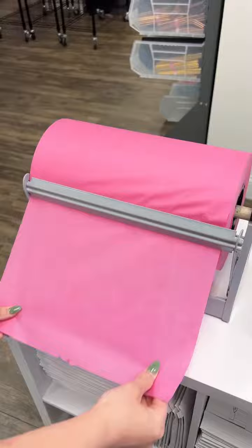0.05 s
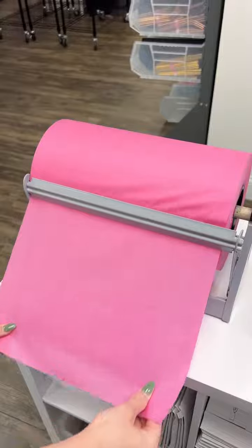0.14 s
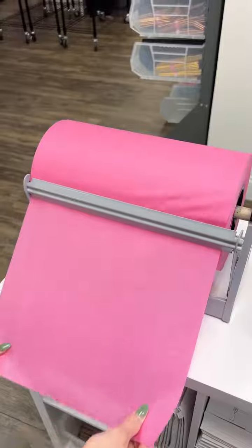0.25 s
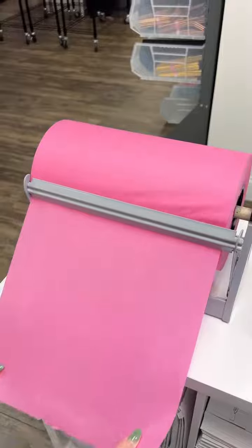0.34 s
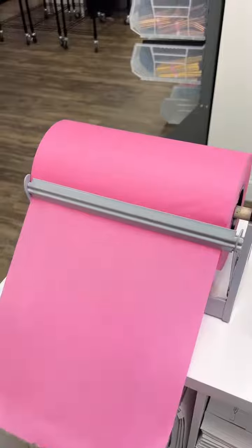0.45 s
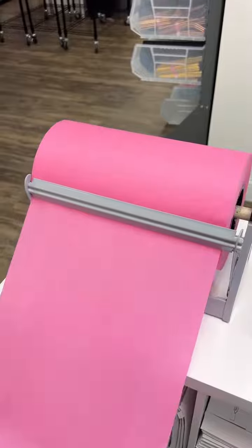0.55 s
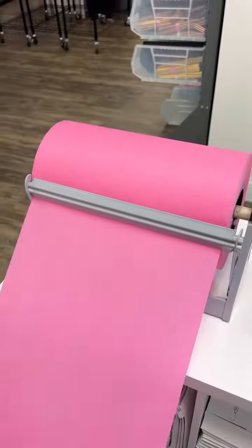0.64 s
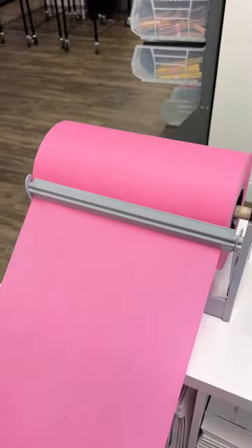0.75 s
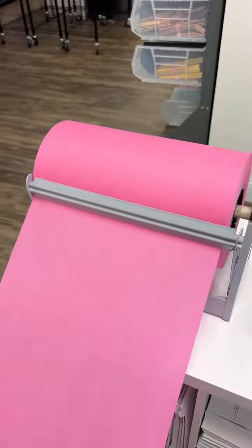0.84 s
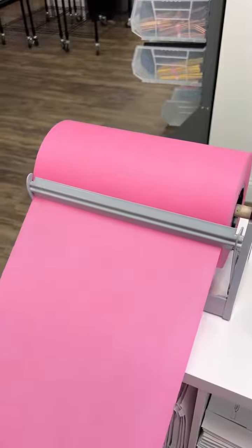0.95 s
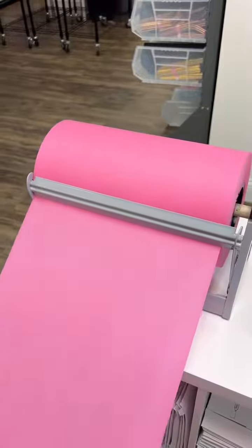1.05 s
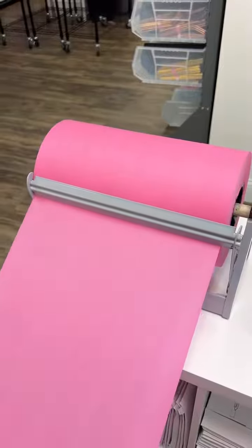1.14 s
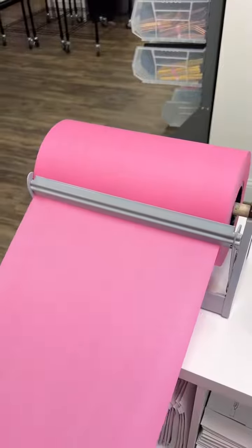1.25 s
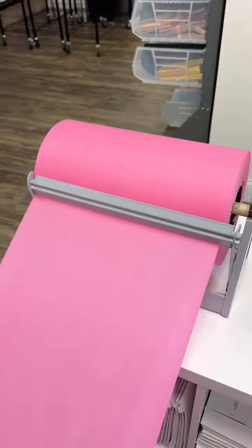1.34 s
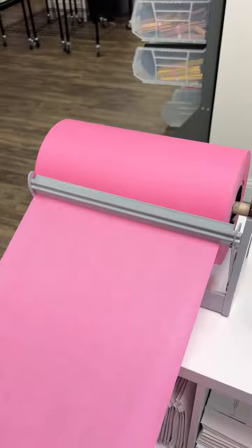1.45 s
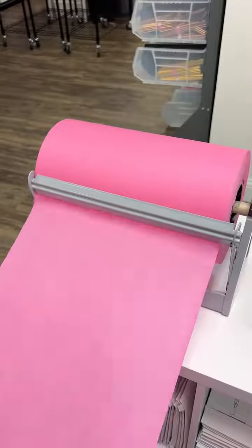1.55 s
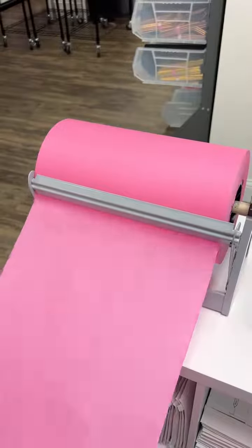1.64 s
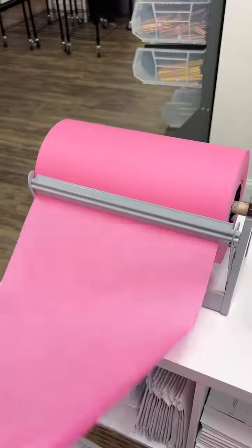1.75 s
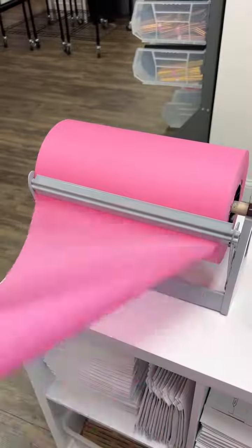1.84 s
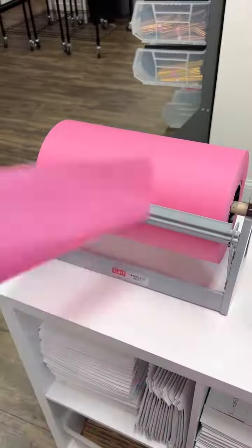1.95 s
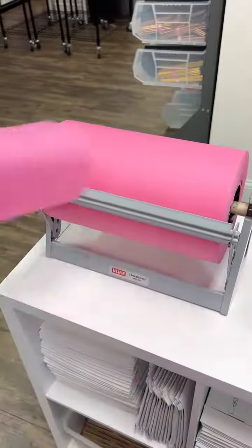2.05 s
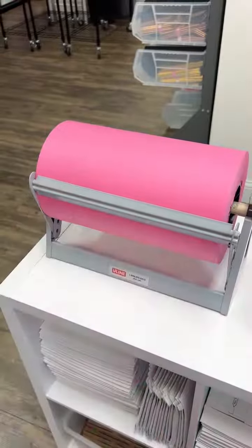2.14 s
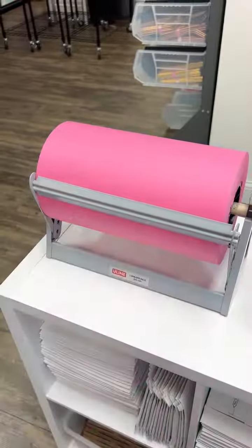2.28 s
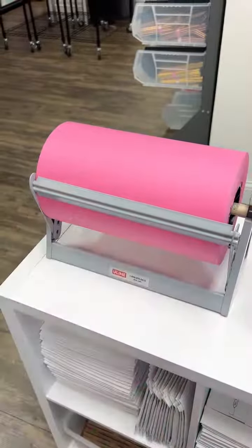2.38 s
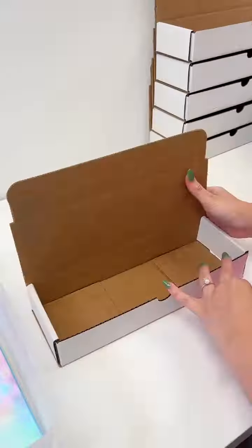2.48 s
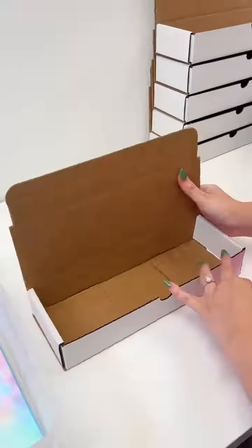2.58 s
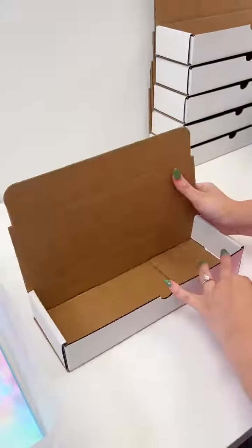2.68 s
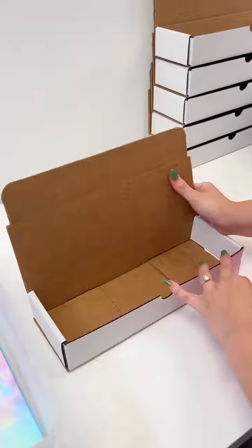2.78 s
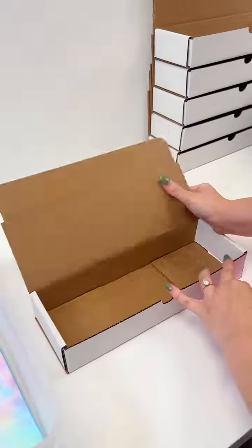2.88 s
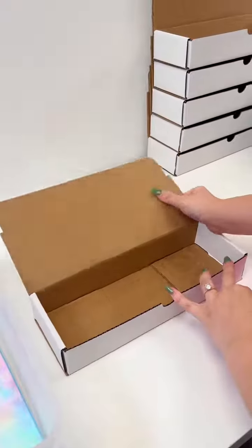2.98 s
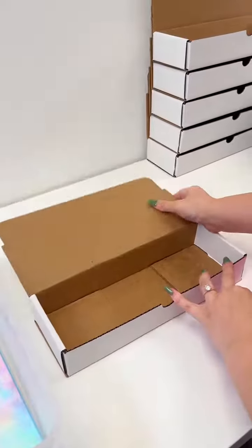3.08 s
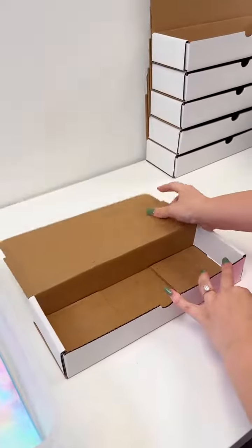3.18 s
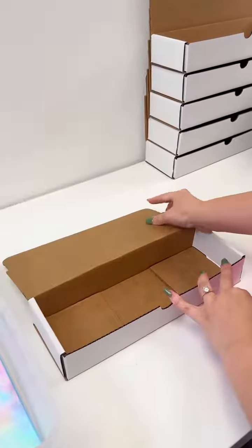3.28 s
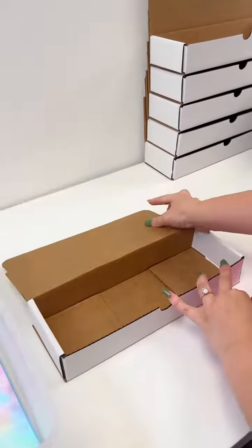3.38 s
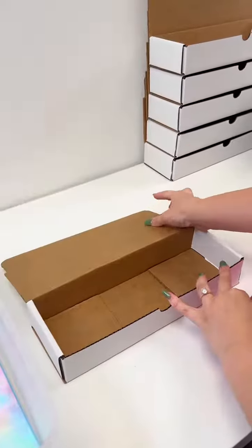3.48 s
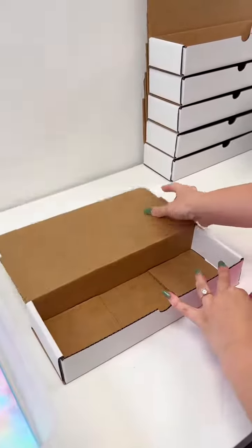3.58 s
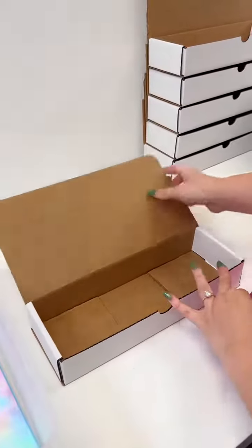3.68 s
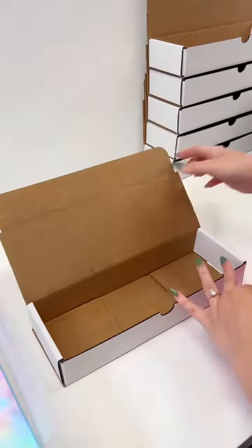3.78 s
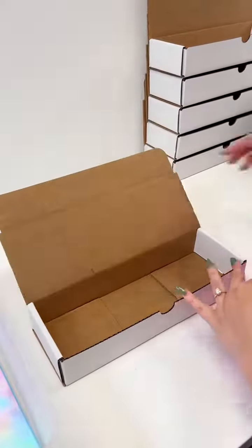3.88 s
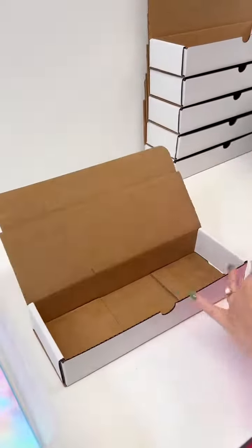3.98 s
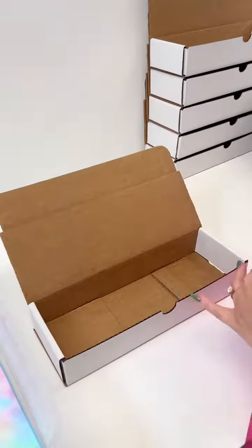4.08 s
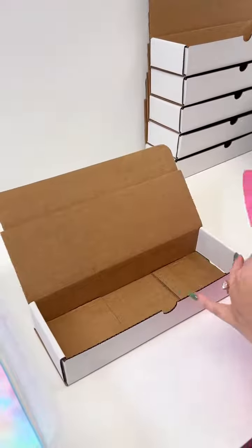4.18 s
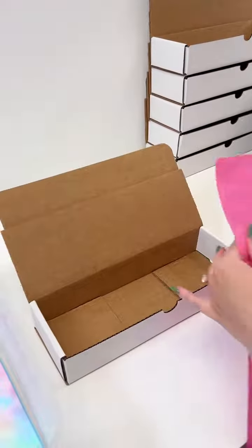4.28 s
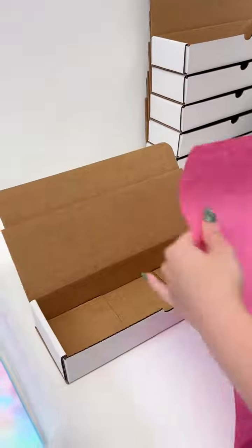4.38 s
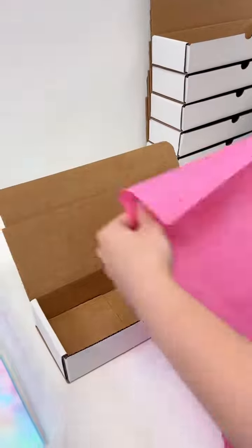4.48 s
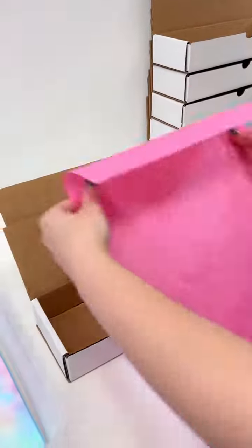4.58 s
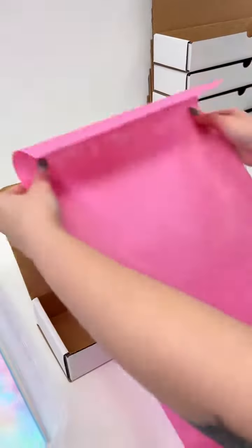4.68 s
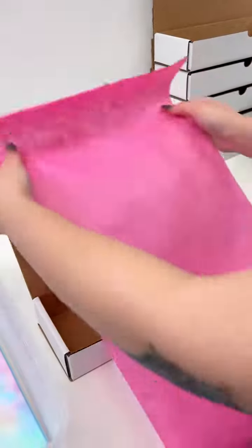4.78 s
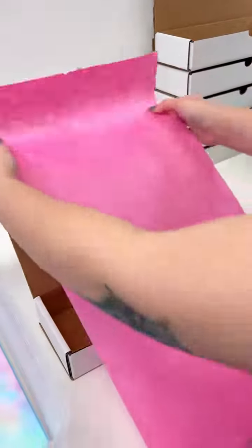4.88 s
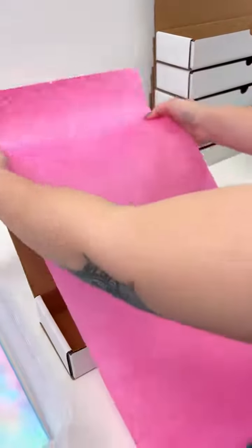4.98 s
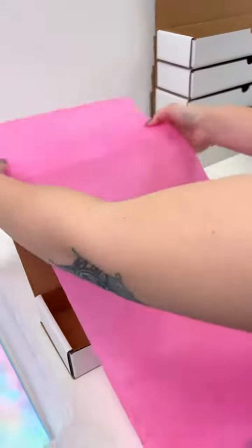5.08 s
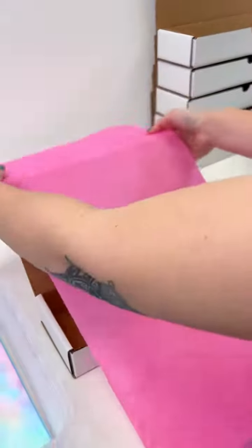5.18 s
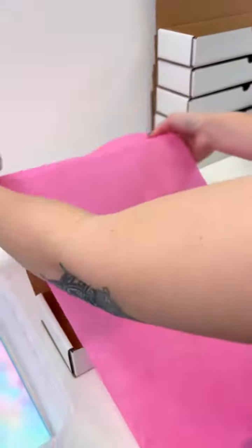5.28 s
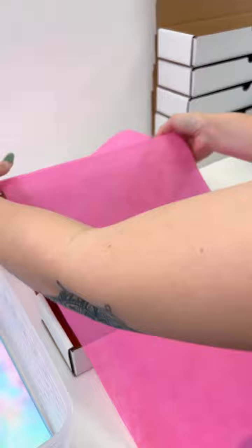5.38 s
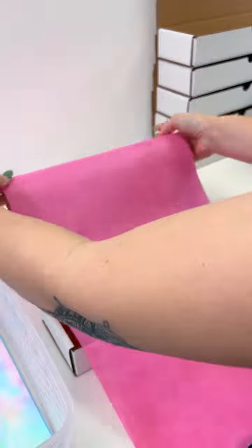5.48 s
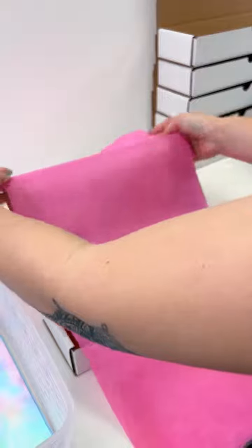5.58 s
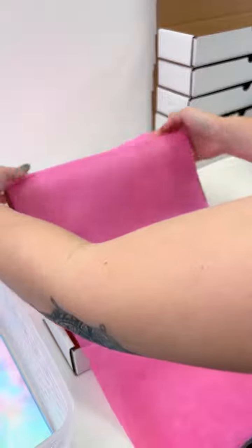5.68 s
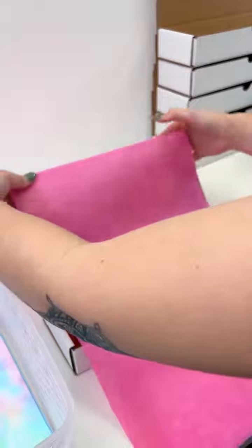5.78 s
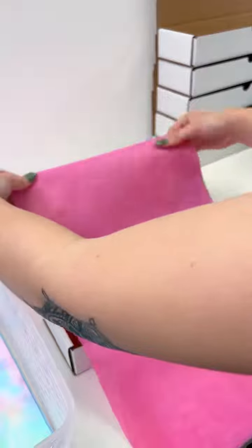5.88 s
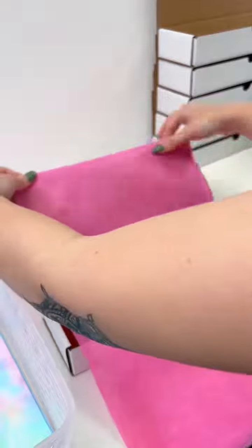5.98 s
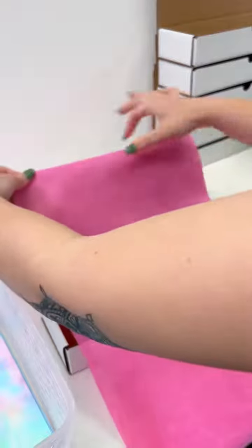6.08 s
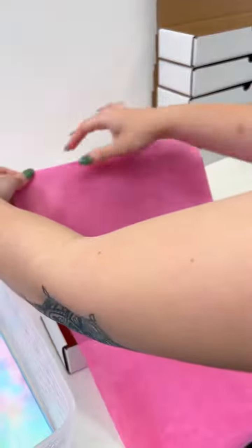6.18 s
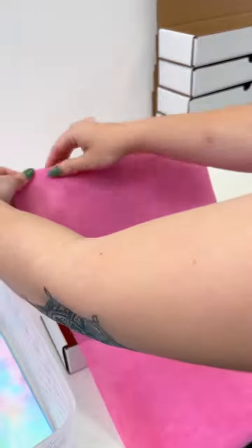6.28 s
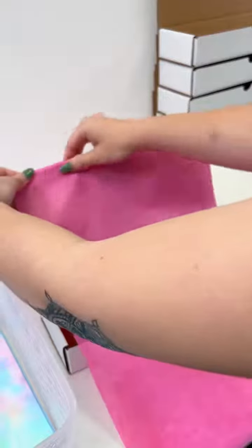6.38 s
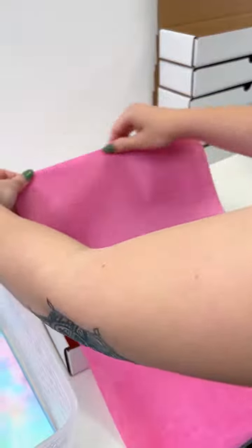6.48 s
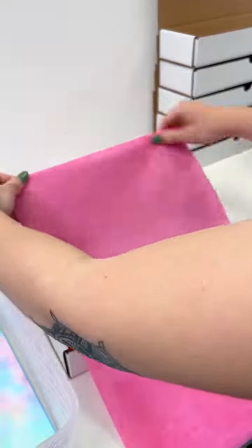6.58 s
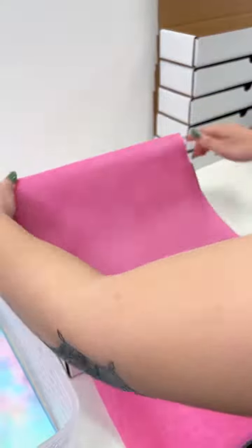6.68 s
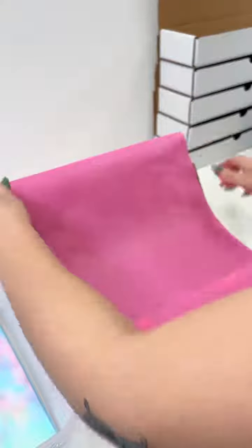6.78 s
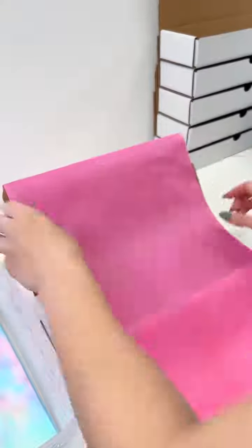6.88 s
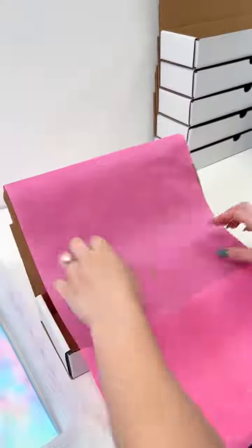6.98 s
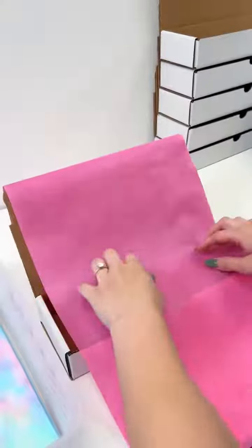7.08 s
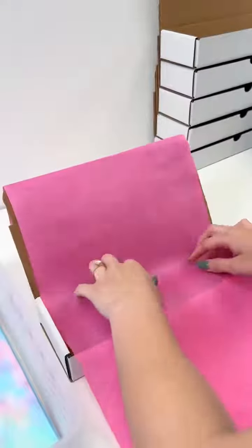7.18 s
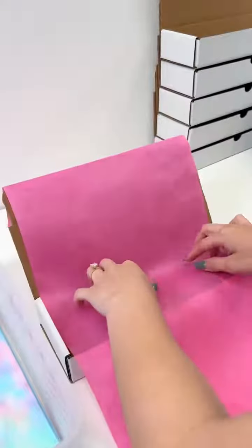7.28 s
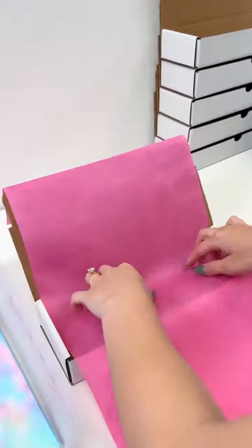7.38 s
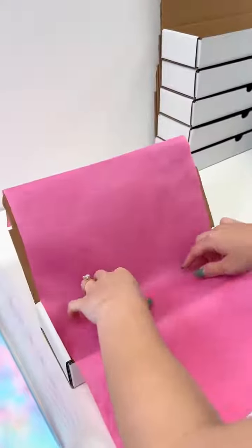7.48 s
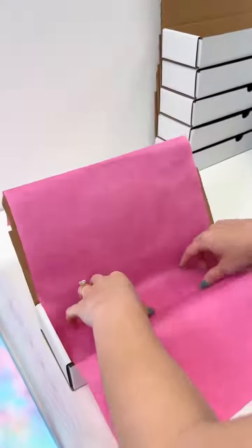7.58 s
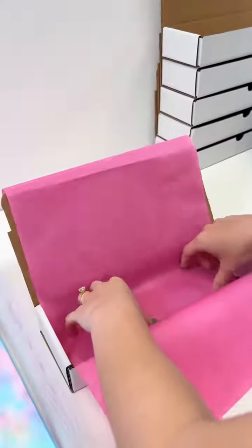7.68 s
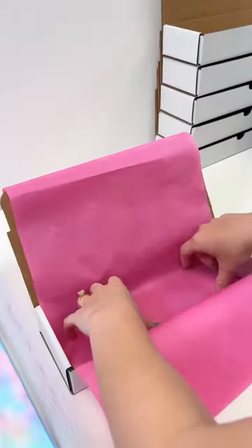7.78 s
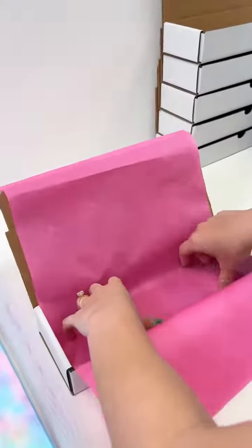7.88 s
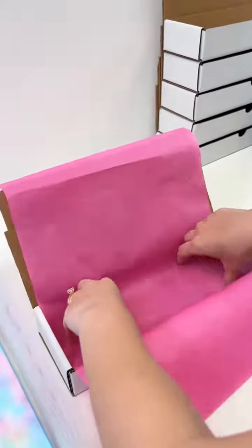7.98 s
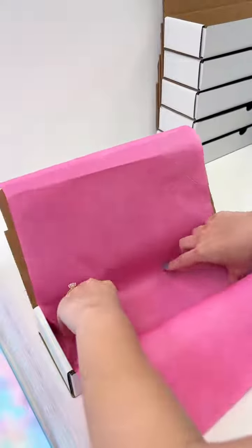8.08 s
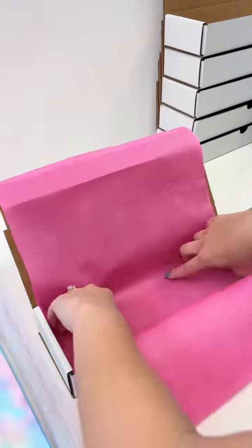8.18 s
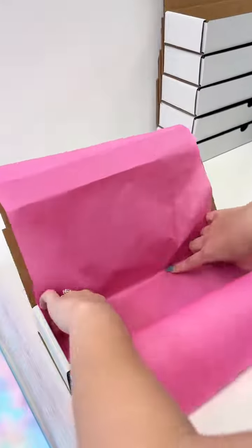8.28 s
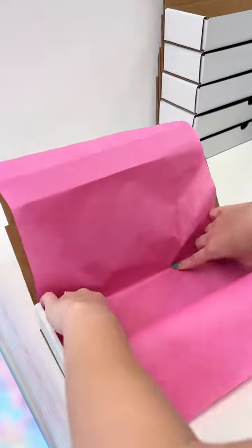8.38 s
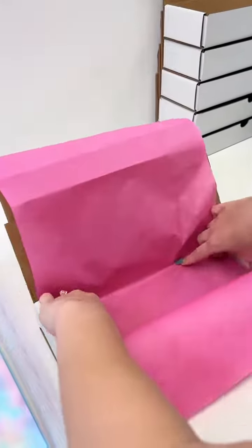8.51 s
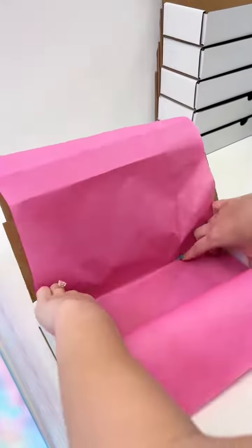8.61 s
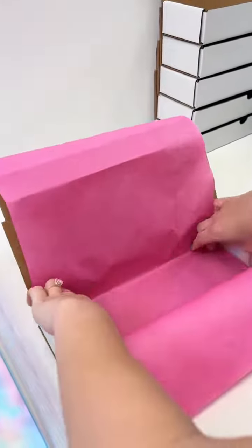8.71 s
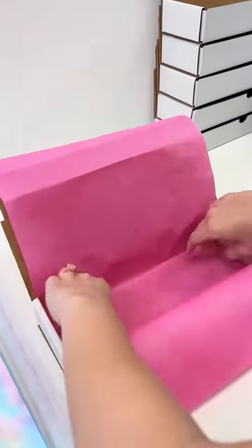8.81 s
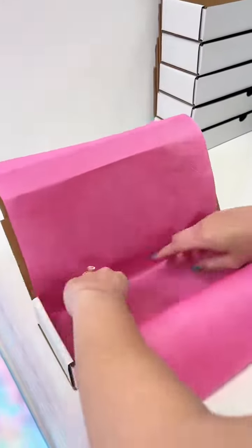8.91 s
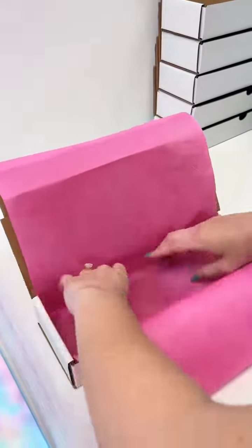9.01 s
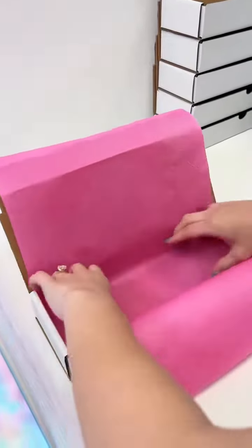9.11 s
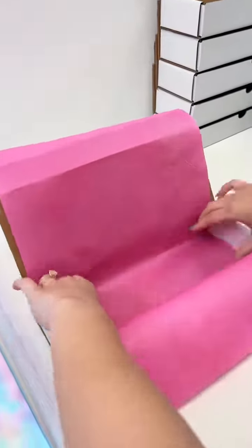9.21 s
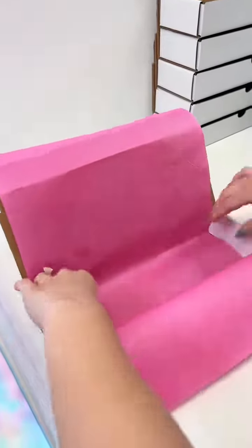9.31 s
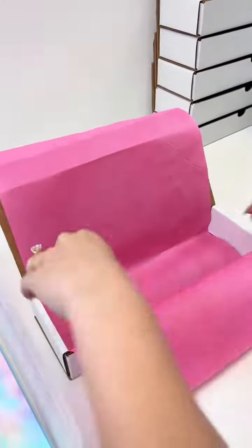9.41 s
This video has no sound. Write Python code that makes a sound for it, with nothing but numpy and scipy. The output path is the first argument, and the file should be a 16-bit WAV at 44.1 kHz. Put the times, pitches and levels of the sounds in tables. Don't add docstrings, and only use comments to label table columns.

```python
import sys
import numpy as np
from scipy import signal
from scipy.fft import rfft, irfft, next_fast_len
from scipy.io import wavfile
from scipy.ndimage import uniform_filter1d

SR = 44100
rng = np.random.default_rng(int(sys.argv[2]) if len(sys.argv) > 2 else 0)


def to_linear_factor(level_db):
    exponent = np.asarray(level_db, float) / 20
    return 10 ** exponent


def wav_record(signal):
    frames = np.transpose(np.atleast_2d(signal))
    bounded = np.clip(frames, -1, 1)
    quanta = np.round(bounded * 32767).astype(np.int16)
    wavfile.write(sys.argv[1], SR, quanta)


N = 416744

# (frequency [Hz], density [dB per Hz])
AIR_COLOUR = [(15, -29), (28, -3), (60, 3), (88, 4), (120, 0), (160, -16.5), (235, -10.5), (330, -11),
              (400, -20), (700, -22), (1100, -32), (2000, -38), (6300, -59), (12000, -63.5)]
# (time [s], level [dB])
AIR_SWELL = [(0, -52), (2.7, -49.5), (3.3, -47.5), (6.5, -49.5), (7.96, -50), (8.18, -45.5), (9.45, -51)]
# (frequency [Hz], level [dB])
SQUEAK_LINES = [(940, -51), (2350, -54), (4100, -61), (6300, -58)]
# (time [s], level [dB], hardness [dB])
KNOCKS = [(2.812, -33, -12), (2.8265, -4, -1), (2.8395, -13, -5), (2.866, -28, -2), (2.877, -27, -6),
          (2.926, -38, -2), (2.948, -33, -5), (2.981, -34, -6), (3.243, -30, -3), (3.25, -35, -12),
          (5.429, -37, -8), (5.516, -31, -2), (4.575, -40, 2), (5.816, -28, 0), (8.8758, -31, -3),
          (9.03, -28, 2), (9.08, -33, -3), (8.345, -36, -2)]
# (frequency [Hz], level [dB], decay time t60 [s])
BOX_MODES = [(89, -13.5, 0.15), (150, -18, .07), (240, -7.5, 0.08), (362.4, 6.5, 0.046), (419, -1, 0.07),
             (520, -9, 0.06), (880, -10, 0.035), (1100, 0, .016), (1720, -3, 0.009), (2300, -13, .01),
             (2900, -17, 0.008), (3830, -20, 0.007)]
# (frequency [Hz], width [Hz], level [dB])
HOLLOW = [(247, 139, 2), (359.5, 96, -0.5), (426, 240, 4)]
# (full at [s], hold [s], level [dB], rise [s], fall for 20 dB [s])
THUMPS = [
    (1.64, .001, -43, .12, .3),
    (1.86, .02, -28, .025, .15),
    (1.98, .001, -37, .06, .04),
    (2.85, .025, -35, .02, .25),
    (5.06, .001, -46, .05, .18),
    (5.51, .001, -44, .17, .28),
    (5.84, .001, -44, .2, .03),
    (8.88, .001, -40, .03, .2),
    (9.04, .12, -42, .12, .1),
]
# (time [s], peak level [dB], ring [Hz], level above 6 kHz [dB])
TEAR_SNAPS = [(1.579, -22, 4280, -18), (1.608, -16.5, 3375, -25.5), (1.67, -16.5, 2270, -31),
              (1.764, -15, 2300, -11), (1.84, -1.5, 3480, -26.5), (2.191, -27, 4400, -13.5),
              (2.523, -27, 4350, -14), (2.62, -30, 1700, -25), (2.8268, -21, 1150, -45),
              (1.866, -7, 800, -40), (1.893, -9, 760, -40), (1.915, -5, 3300, -16), (3.248, -22, 950, -45),
              (3.034, -23.5, 1110, -15), (3.243, -26, 930, -30), (3.517, -40, 2500, -14),
              (3.61, -25, 1710, -24), (3.689, -34, 1900, -21), (3.941, -22, 2300, -30)]
# (time [s], peak level [dB], ring [Hz], level above 6 kHz [dB])
LAY_SNAPS = [(4.254, -27, 2530, -22), (4.36, -19.5, 2580, -26), (4.417, -18, 2690, -9),
             (4.526, -23, 2200, -17.5), (4.68, -24.5, 2570, -22), (4.938, -25, 2400, -22),
             (5.073, -18.5, 2540, -27), (5.509, -19, 835, -9), (5.569, -18.5, 2600, -3),
             (5.657, -24, 2450, -14.5), (5.748, -23, 2000, -15), (4.58, -28, 700, -25),
             (5.997, -19, 2800, -12), (5.923, -16, 3960, -8), (5.945, -20, 2120, -16),
             (6.149, -41, 2000, -27.5), (6.176, -40, 810, -25), (6.268, -24, 900, -31),
             (6.277, -20, 2800, -1), (6.394, -29, 4150, -14), (6.479, -17.5, 2920, -8),
             (6.842, -38, 1400, -18)]
# (time [s], peak level [dB], ring [Hz], level above 6 kHz [dB])
PRESS_SNAPS = [(7.058, -28, 2450, -23), (7.068, -26, 2340, -18), (7.189, -15, 1910, 0),
               (7.263, -26.5, 1060, -22), (7.495, -11.5, 2340, -17), (7.556, -17, 2530, -24),
               (7.739, -13.5, 1730, -16), (7.758, -15.5, 2120, -13), (7.807, -12, 1600, -15.5),
               (7.842, -22, 1500, -25), (7.9, -25.5, 1180, -15), (7.986, -19, 2500, -14),
               (8.066, -23, 1900, -16.5), (8.088, -16, 1410, -17), (8.119, -18.5, 1920, -18),
               (8.24, -15, 3000, -12), (8.388, -22, 1840, -9.5), (8.518, -21, 926, 0),
               (8.567, -16.5, 1600, -11.5), (8.689, -21, 5400, -26), (8.791, -29, 2000, -24),
               (8.989, -16, 1130, -26), (9.0, -19, 1060, -21), (9.022, -21, 1050, -19),
               (9.104, -14, 1680, -15), (9.178, -15.5, 1140, -19)]
# (time [s], peak level [dB], ring [Hz], level above 6 kHz [dB])
TICKS = [(1.4511, -42, 1270, -18), (1.5179, -38, 2680, -23), (1.5354, -33, 1960, -21),
         (2.7427, -50, 1270, -20), (2.7626, -49, 1280, -17), (3.3358, -50, 1750, -28),
         (3.5658, -50, 1950, -14), (3.7284, -41, 2070, -14), (3.7509, -37, 2080, -18),
         (3.7773, -38, 1850, -18), (3.8906, -41, 2340, -26), (4.2178, -41, 1690, -22),
         (4.2403, -31, 2440, -14), (4.2926, -30, 1240, -16), (4.334, -22, 2970, -13),
         (4.7351, -35, 1650, -19), (4.7965, -33, 1450, -22), (4.8374, -34, 3040, -20),
         (4.8683, -32, 1450, -22), (5.024, -34, 2650, -22), (5.0654, -24, 2200, -19),
         (5.1307, -30, 2660, -20), (5.2609, -30, 1400, -27), (5.3228, -36, 1410, -16),
         (5.4181, -37, 2670, -15), (5.467, -31, 2630, -14), (5.7897, -31, 2790, -18),
         (5.8052, -28, 1200, -20), (5.8606, -30, 1250, -18), (6.2971, -23, 1310, -15),
         (6.534, -22, 2390, -16), (6.7361, -43, 2580, -22), (6.773, -43, 2500, -22),
         (7.0279, -49, 2890, -18), (7.0399, -33, 2370, -14), (7.1187, -21, 2700, -13),
         (7.2174, -23, 1310, -14), (7.5338, -18, 1530, -18), (7.6789, -19, 1380, -17),
         (7.8504, -23, 1710, -23), (7.9618, -23, 3290, -13), (8.0177, -22, 1300, -13),
         (8.328, -32, 3130, -16), (8.6158, -29, 1820, -20), (8.6682, -25, 1550, -15),
         (8.768, -33, 2410, -14), (8.8717, -37, 1850, -23), (9.1556, -20, 1440, -18),
         (9.3087, -45, 1610, -22)]
# (time [s], level [dB])
PULL = [(0, -33.5), (.41, -37.5), (.896, -34.5), (1.286, -39.5), (1.394, -48.5), (1.43, -58), (1.5, -60),
        (1.52, -85)]
# (full at [s], hold [s], effort [dB], rise [s], fall for 20 dB [s])
TEAR_STROKES = [(1.56, .001, -43, .09, .07), (1.622, .04, -34.5, .1, .1), (1.695, .02, -28.5, .06, .07),
                (1.76, .012, -31, .05, .04), (1.87, .05, -22, .03, .05), (1.841, .204, -18.5, .018, .03),
                (2.07, .001, -32.5, .02, .22), (2.198, .001, -31.5, .08, .1), (2.268, .19, -48, .05, .03),
                (2.53, .001, -53, .1, .25), (2.825, .05, -53, .02, .3), (3.04, .07, -47.5, .11, .065),
                (3.222, .012, -55, .03, .02), (3.595, .001, -65, .35, .05), (3.611, .001, -47, .017, .017),
                (3.861, .001, -52, .35, .13), (3.943, .001, -47, .03, .03), (3.957, .001, -56, .02, .45)]
# (full at [s], hold [s], effort [dB], rise [s], fall for 20 dB [s])
LAY_STROKES = [(4.27, .001, -41, .055, .055), (4.33, .02, -37, .05, .06), (4.365, .005, -27.5, .03, .035),
               (4.42, .001, -28, .02, .035), (4.46, .02, -45, .05, .1), (4.545, .001, -47, .05, .08),
               (4.6, .06, -46, .06, .2), (4.72, .05, -49, .08, .2), (4.82, .05, -47, .08, .07),
               (4.93, .01, -49, .05, .06), (4.96, .07, -53, .05, .1), (5.08, .001, -41, .06, .4),
               (5.19, .07, -49, .08, .06), (5.345, .03, -48, .04, .1), (5.47, .02, -46, .07, .08),
               (5.6, .02, -50, .04, .1), (5.68, .03, -45, .05, .1), (5.8, .01, -46, .06, .08),
               (5.89, .01, -44, .05, .1), (5.515, .015, -40, .02, .04), (5.945, .065, -38, .12, .07),
               (6.15, .001, -61, .1, .1), (6.264, .03, -41, .013, .05), (6.326, .001, -31.5, .07, .1),
               (6.38, .26, -41.5, .08, .12), (6.488, .001, -40, .1, .18)]
# (full at [s], hold [s], effort [dB], rise [s], fall for 20 dB [s])
PRESS_STROKES = [(7.08, .001, -38, .04, .2), (7.124, .001, -35, .06, .13), (7.193, .025, -31, .008, .045),
                 (7.6, .1, -32.5, .42, .055), (7.74, .13, -44.5, .03, .15), (7.98, .05, -37.5, .1, .3),
                 (8.16, .085, -34, .2, .07), (8.3, .1, -46, .05, .25), (8.566, .001, -41.5, .09, .085),
                 (8.708, .001, -40, .14, .115), (8.8, .05, -58, .02, .05), (8.885, .08, -51, .015, .05),
                 (9.0, .05, -42, .012, .1), (9.114, .001, -34, .13, .13), (9.2, .03, -47, .05, .065)]
# (from [s], crispness above 7 kHz [dB], flap near 1 kHz [dB], drumming [dB])
GRIPS = [(0, -4, -9.5, -60), (.9, -7.5, -12, -60), (1.44, -17, -5, -60), (1.82, -11.5, -4, -63),
         (2.07, -11, -7.5, -58), (2.47, -8.5, -8, -55), (2.8, -7, 5, -52), (3.0, -7.5, -2, -50),
         (3.27, -11, -7.5, -58), (4.21, -15, -6.5, -57), (4.46, -13, -5.5, -54), (5.3, -10, -5, -53),
         (5.87, -14, -4, -52), (6.25, -13, -3, -48), (6.36, -6.5, -6, -50), (6.9, -14, -4, -50),
         (7.26, -6, -6, -56), (7.45, -12, -3, -54), (7.9, -9, -2.5, -52), (8.28, -10, -4.5, -50.5),
         (8.86, -15, 1, -50), (9.02, -9, -1, -55)]
# (frequency [Hz], density [dB per Hz])
ROLL_COLOUR = [(500, -6), (1300, -3.5), (1900, -4.5), (3100, -5.5), (4700, -4.5), (5100, -13.5),
               (6400, -16), (7700, -21.5), (8300, -25.5), (10000, -29.5), (11900, -23), (12100, -32.5),
               (16000, -63)]
# (frequency [Hz], density [dB per Hz])
RIP_COLOUR = [(500, -2), (900, 0), (1500, -3), (2500, 0), (4000, -1), (5000, -5), (8000, -9.5),
              (11900, -17), (12100, -14), (16000, -34.5)]
# (frequency [Hz], density [dB per Hz])
SHEET_COLOUR = [(500, -3.5), (1200, -1.5), (2300, -7.5), (3300, -9.5), (4800, -13.5), (6200, -13),
                (9500, -21.5), (11900, -22), (12100, -22.5), (16000, -32.5)]
# (time [s], frequency [Hz])
BELLY = [(1.44, 2300), (1.82, 3000), (2.07, 2600), (2.8, 1080), (3.27, 1500), (3.8, 2200), (4.21, 2550),
         (4.5, 1900), (5.0, 2300), (5.7, 1400), (5.88, 2500), (6.25, 2500), (7.0, 2250), (7.5, 1900),
         (7.95, 1900), (8.28, 2600), (8.43, 1800), (8.97, 1300), (9.07, 1600), (9.15, 1200), (9.23, 2000)]
# (frequency [Hz], level [dB])
SIDE_COLOUR = [(40, -38), (130, -38), (230, -23), (420, -21), (700, -12), (1150, -17), (1400, -27),
               (2000, -26), (2500, -9), (4500, -7), (6200, -4), (6350, -34), (7900, -30), (8050, -7),
               (11950, -5), (12100, -19)]
# (time [s], share [ratio])
SWING = [(2.03, 0), (2.07, .35), (2.4, .35), (2.47, 0)]
# (frequency [Hz], level under crispness [dB], spans (from [s],
# to [s]))
WHISTLES = [
    (11887, -14, [(1.92, 2.11), (4.96, 5.13)]),
    (12575, -9, [(0, 1.44), (2.83, 3.26), (3.61, 3.88), (6.33, 6.43), (6.55, 7.1), (7.26, 7.47), (7.61, 7.66), (7.74, 7.79), (7.99, 8.21), (8.6, 8.95), (9.16, 9.32)]),
    (15332, -15, [(.06, .24), (.34, .71), (2.83, 2.9), (3.07, 3.27), (3.52, 3.61), (4.4, 4.47), (6.41, 6.72), (6.77, 6.89), (7.74, 7.78), (8.18, 8.22), (8.27, 8.32), (8.74, 8.8), (9.19, 9.25)]),
]

TOP_HZ, END_HZ = 13100, 15850
ROLL_END_S = 1.47


def evened(x):
    return x / np.sqrt(np.mean(x ** 2) + 1e-20)


def read(points, hz):
    f, value = np.transpose(points)
    return np.interp(np.log(hz + 1), np.log(f + 1), value)


def curve(points, t):
    return np.interp(t, *np.transpose(points))


def add(mix, s, sound):
    part = mix[round(s * SR):][:len(sound)]
    part += sound[:len(part)]


def band(x, lo_hz, hi_hz):
    sos = signal.butter(3, [lo_hz, hi_hz], "bandpass", fs=SR, output="sos")
    return evened(signal.sosfilt(sos, x))


def colour(x, points):
    size = next_fast_len(N)
    gain = to_linear_factor(read(points, np.fft.rfftfreq(size, 1 / SR)))
    return irfft(rfft(x, size) * gain, size)[:N]


def drift(per_s):
    sos = signal.butter(1, per_s, fs=SR, output="sos")
    return evened(signal.sosfilt(sos, rng.standard_normal(N)))


def patches(shape, bins, frames):
    field = rng.standard_normal(shape[::-1]).T
    return evened(uniform_filter1d(uniform_filter1d(field, bins, 0), frames, 1))


def ventilation():
    rumble = evened(colour(rng.standard_normal(N), AIR_COLOUR))
    return to_linear_factor(curve(AIR_SWELL, np.arange(N) / SR) + 3.5) * rumble


def scatter(x, t60):
    t = np.arange(6000) / SR
    taps = rng.standard_normal(len(t)) * to_linear_factor(-60 * t / t60)
    return signal.oaconvolve(x, taps / np.linalg.norm(taps))[:N]


def squeak():
    start_s, length_s = 3.214, .028
    out, size = np.zeros(N), round(length_s * SR)
    settle = 600
    noise = rng.standard_normal(size + settle)
    lines = sum(to_linear_factor(db) * band(noise, hz / 1.06, hz * 1.06)[settle:] for hz, db in SQUEAK_LINES)
    add(out, start_s, lines * signal.windows.tukey(size, .4))
    return out


def knocks():
    out, t = np.zeros(N), np.arange(8000) / SR
    for s, db, hard_db in KNOCKS:
        for hz, mode_db, t60 in BOX_MODES:
            rise = (1 - np.exp(-t * hz / 0.5)) ** 2
            tilt_db = hard_db * np.log2(hz / 360) / 2
            decay = to_linear_factor(db + mode_db + tilt_db - 60 * t / t60)
            add(out, s, decay * rise * np.sin(2 * np.pi * hz * t))
    return out


def snaps():
    rows = TEAR_SNAPS + LAY_SNAPS + PRESS_SNAPS + TICKS
    out, t = np.zeros(N), np.arange(1800) / SR
    tail = to_linear_factor(-60 * t / .028) + .1 * to_linear_factor(-60 * t / .1)
    fall = (1 - np.exp(-t / .0015)) * tail
    noises = rng.standard_normal((len(rows), len(t)))
    bursts = band(noises, 600, 6500)
    cracks = band(noises, 6000, 15500)
    for (s, db, hz, crack_db), noise, burst, crack in zip(rows, noises, bursts, cracks):
        ring = band(noise, hz / 1.3, hz * 1.3)
        width = min(hz / 1300, 1) ** 4
        snap = fall * (0.46 * ring + 0.55 * width * burst + to_linear_factor(crack_db + 3.5) * crack)
        add(out, s - .0005, to_linear_factor(db - 5.5) * snap / abs(snap).max())
    return out


def strokes(rows, t):
    s, hold, db, rise, fall = np.transpose(rows)[:, :, None]
    swell = np.clip(1 + (t - s) / rise, 0, 1) ** 1.5
    fall_db = 20 * (np.maximum(t - s - hold, 0) / fall) ** 1.1
    return ((swell * to_linear_factor(db - fall_db)) ** 2).sum(0)


def hands(at):
    still_db, middling_db = -80, -45
    follow = [.05, -.25, .7]  # crispness, flap, drumming [dB per dB of effort]
    t = np.arange(0, N / SR + .01, .002)
    pull = to_linear_factor(curve(PULL, t)) ** 2 * (t < PULL[-1][0])
    power = pull + strokes(TEAR_STROKES + LAY_STROKES + PRESS_STROKES, t) + to_linear_factor(still_db) ** 2
    effort_db = 10 * np.log10(power)
    s, *grip = np.transpose(GRIPS)
    grip = np.array(grip)[:, np.searchsorted(s, t, "right") - 1]
    grip = uniform_filter1d(grip, size=10)
    crisp_db, flap_db, drum_db = grip + np.outer(follow, effort_db - middling_db)
    drum_db = 10 * np.log10(to_linear_factor(drum_db) ** 2 + strokes(THUMPS, t))
    return [np.interp(at, t, db) for db in (effort_db, crisp_db, flap_db, drum_db)]


def fibres(per_s, spread_db, t60, clump_db, clumps_per_s, hiss):
    sizes = to_linear_factor(spread_db * np.minimum(rng.exponential(1, N), 3.5))
    slips = (rng.random(N) < per_s / SR) * sizes
    t = np.arange(600) / SR
    power = signal.oaconvolve(slips ** 2, to_linear_factor(-120 * t / t60))[:N]
    burst = np.sqrt(np.abs(power))
    swell = to_linear_factor(clump_db * drift(clumps_per_s))
    return evened((hiss + evened(burst)) * swell * rng.standard_normal(N))


def sheet_gain(hz, t):
    held = t > ROLL_END_S
    effort_db, crisp_db, flap_db = hands(t)[:3]
    colour_db = np.where(held, read(SHEET_COLOUR, hz)[:, None], read(ROLL_COLOUR, hz)[:, None])
    colour_db[:, (t > 1.82) & (t < 2.07)] = read(RIP_COLOUR, hz)[:, None]

    def share_db(lo_hz, hi_hz):
        power = to_linear_factor(colour_db[(hz > lo_hz) & (hz < hi_hz)]) ** 2
        return 10 * np.log10(power.sum(0) / len(hz))

    middle_db = share_db(1800, 6500)
    high = read([(5000, 0), (8000, 1)], hz)[:, None]
    low = read([(1400, 1), (2200, 0)], hz)[:, None]
    tilt_db = high * (crisp_db + middle_db - share_db(7500, 12000))
    tilt_db = tilt_db + low * (flap_db + middle_db - share_db(700, 1600))
    shape = (len(hz), len(t))
    blobs_db = np.where(held, 2.0, 1.3) * patches(shape, bins=6, frames=6)
    drifts_db = np.where(held, 1.1, .7) * patches(shape, bins=12, frames=40)
    s, belly_hz = np.transpose(BELLY)
    belly_hz = belly_hz[np.maximum(np.searchsorted(s, t) - 1, 0)]
    octaves = np.log2((hz[:, None] + 1) / belly_hz)
    belly_db = held * 2.0 * (np.exp(-(octaves / .4) ** 2) - .3)
    return belly_db + colour_db - middle_db + effort_db + tilt_db + blobs_db + drifts_db - 0.74


def paper():
    drag = fibres(per_s=2500, spread_db=3.6, t60=.004, clump_db=.9, clumps_per_s=40, hiss=2.0)
    rustle = fibres(per_s=900, spread_db=3.1, t60=.012, clump_db=1.1, clumps_per_s=25, hiss=1.3)
    push = np.where(np.arange(N) < ROLL_END_S * SR, drag, rustle)
    hz, t, z = signal.stft(push, SR, nperseg=256, noverlap=192)
    z = z * to_linear_factor(sheet_gain(hz, t)) * (hz > 480)[:, None]
    sheet = signal.istft(z, SR, nperseg=256, noverlap=192)[1][:N]
    drum = sum(to_linear_factor(db) * band(push, hz - width / 2, hz + width / 2) for hz, width, db in HOLLOW)
    drum = evened(drum + 0.98 * band(push, 120, 650))
    t = np.arange(N) / SR
    roll = to_linear_factor(curve(PULL, t) - 21) * band(drag, 190, 400)
    return sheet + roll + to_linear_factor(hands(t)[3] - 1.6) * drum


def scene():
    sheet = paper() + snaps() + squeak()
    blows = knocks()
    around = sheet + to_linear_factor(-14) * scatter(sheet + blows, .16) + ventilation()
    z = signal.stft(around, SR, nperseg=256)[2]
    power = uniform_filter1d(abs(z) ** 2, size=3, axis=0)
    power = uniform_filter1d(power, size=6, axis=1, origin=2)
    level = np.sqrt(abs(power))
    other = signal.stft(rng.standard_normal(N), SR, nperseg=256)[2]
    other = level * other / np.sqrt(np.mean(abs(other) ** 2))
    other = signal.istft(other, SR, nperseg=256)[1]
    side = colour(other[:N], SIDE_COLOUR) + curve(SWING, np.arange(N) / SR) * sheet
    return np.array([around + blows + side, around + blows - side])


def patchy_top_bands(dry):
    hz, t, z = signal.stft(dry, SR, nperseg=1024, noverlap=768)
    bright = (hz > 8000) & (hz < TOP_HZ)
    bright_db = 10 * np.log10((abs(z[0][bright]) ** 2).mean(0) + 1e-16)
    snap = bright_db - uniform_filter1d(bright_db, size=25) > 4.8
    under, lower, upper = patches((3, len(t)), bins=1, frames=8)
    effort_db = hands(t)[0]
    toned = np.any([(t > start) & (t < end) for start, end in WHISTLES[1][2]], axis=0)
    faint = (bright_db + 4.0 * under < -83) & (effort_db > -64) | toned & (under < 1.0)
    stray = np.where((hz > 14400)[:, None], upper > 1.2, lower > 1.7)
    stray = stray & (t > 1) | (effort_db < -64)
    top = (hz > TOP_HZ)[:, None]
    under_top = ((hz > 12050) & (hz <= TOP_HZ))[:, None]
    lost = top & ~(snap | stray) | under_top & faint & ~snap | (hz > END_HZ)[:, None]
    z[:, lost] = 0
    z[:, hz > TOP_HZ] *= to_linear_factor(-6.0)
    return signal.istft(z, SR, nperseg=1024, noverlap=768)[1][:, :N]


def roll_off(x):
    return signal.sosfilt(signal.butter(12, 17080, fs=SR, output="sos"), x)


def record(dry):
    out = patchy_top_bands(dry)
    t = np.arange(N) / SR
    change_s, fade_s = 2.468, .008
    out = out * np.clip(abs(t - change_s) / fade_s, .1, 1)
    effort_db, crisp_db = hands(t)[:2]
    level_db = uniform_filter1d(effort_db + crisp_db, size=1000)
    for hz, db, spans in WHISTLES:
        for start, end in spans:
            on = slice(round(start * SR), round(end * SR))
            tone = np.sin(2 * np.pi * hz * t[on]) * signal.windows.tukey(len(t[on]), .2)
            out[:, on] += to_linear_factor(level_db[on] + db + 2.5) * tone
    return roll_off(out)


dry = scene()
out = record(dry)
wav_record(out)
```